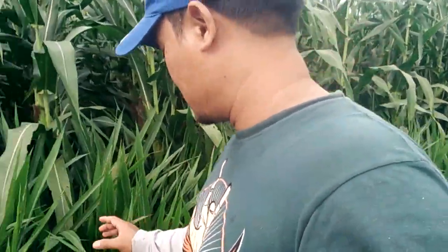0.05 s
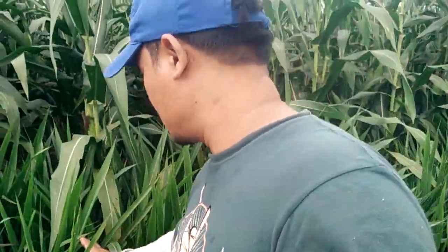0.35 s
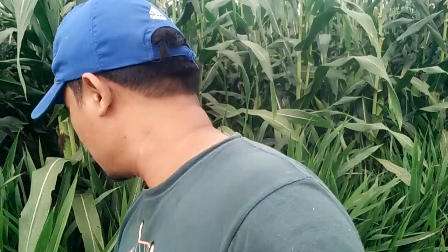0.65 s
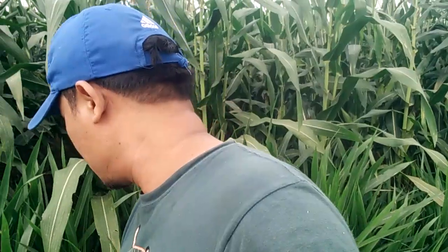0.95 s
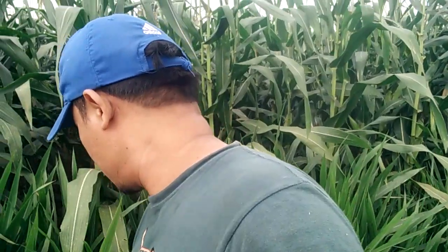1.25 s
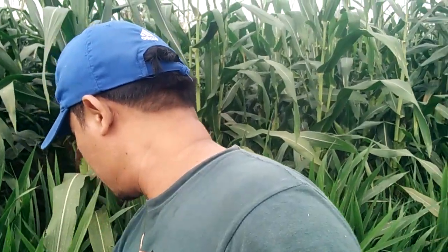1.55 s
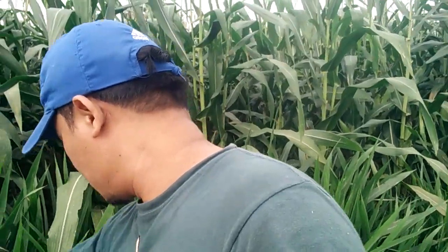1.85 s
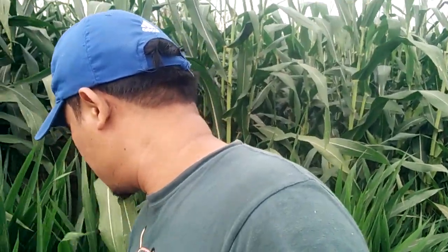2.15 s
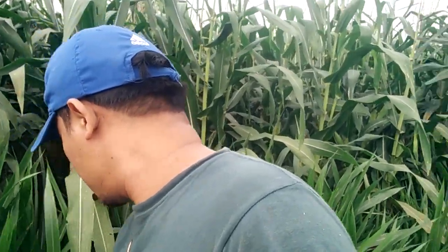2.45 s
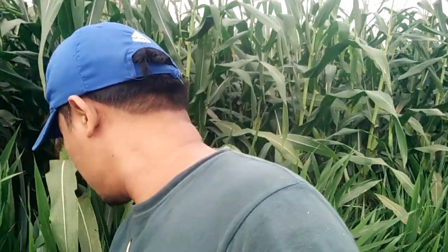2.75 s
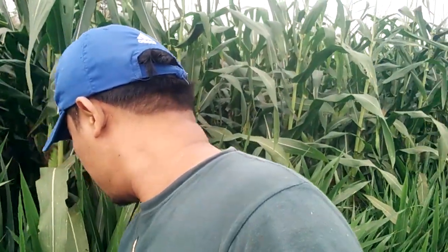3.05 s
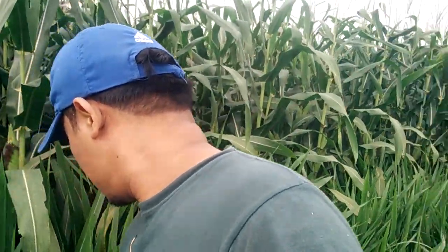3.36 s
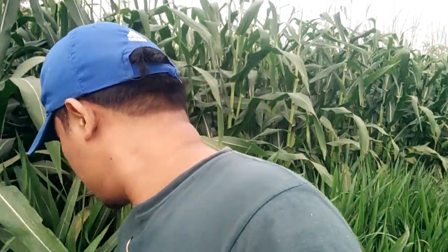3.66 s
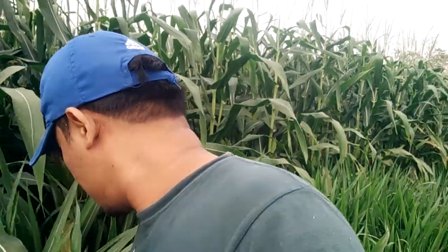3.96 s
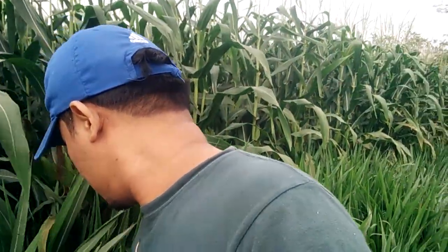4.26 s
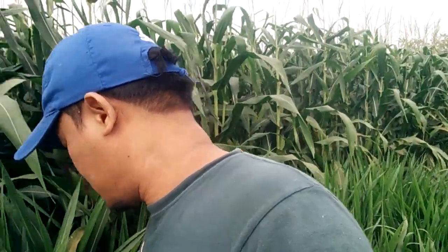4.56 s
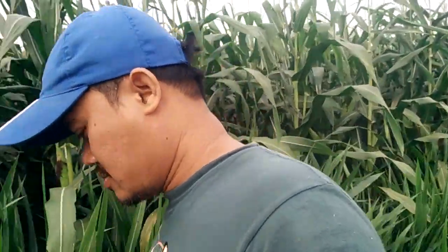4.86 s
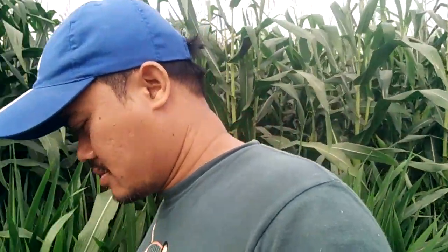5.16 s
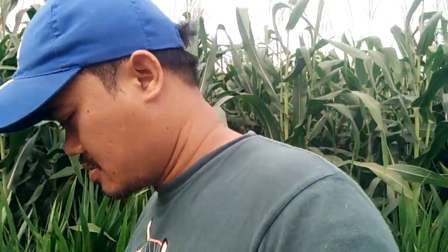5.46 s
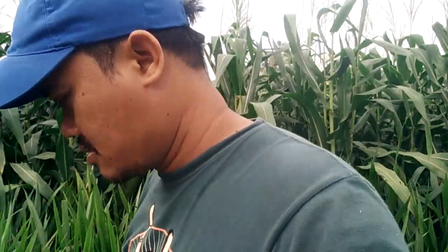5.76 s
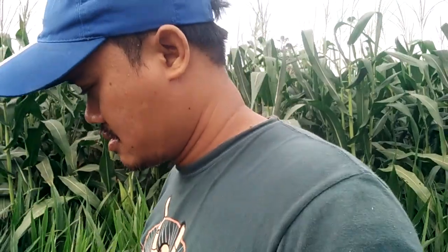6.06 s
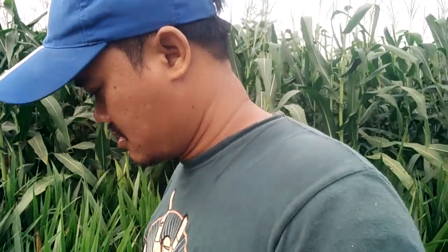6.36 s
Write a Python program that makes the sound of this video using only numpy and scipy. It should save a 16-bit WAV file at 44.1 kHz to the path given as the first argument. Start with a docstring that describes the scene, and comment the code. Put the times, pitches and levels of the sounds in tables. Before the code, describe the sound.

In a corn field, nearby leaves brush and scrape together swish after swish, bright and papery, with occasional ticks and tiny squeaks. The strongest swells fill the first four seconds or so; after a short lull comes one more, then lighter brushing. The rustle spreads around the close microphone, while a distant engine thuds evenly in the centre and high, thin insects pulse on and off behind it.

```python
"""Long corn leaves are pushed aside close by and slide over one another, swish after swish.
Stick-slip friction makes their edges hiss, their faces scrape and their bending blades sound hollow;
now and then one squeaks or snaps free. Far off, a slow single-cylinder engine, probably a field pump,
chugs as a train of exhaust pulses and knocks. Two insects pulse thinly near 7 kHz by stridulation,
over fainter chirps, a few soft low bumps and the noise of distant air."""
import sys
import numpy as np
from scipy import signal
from scipy.fft import rfft, irfft
from scipy.io import wavfile

SR = 44100
rng = np.random.default_rng(int(sys.argv[2]) if len(sys.argv) > 2 else 0)


def int16_out(signal):
    """Quantize to a 16-bit WAV file."""
    q = np.round(np.clip(np.atleast_2d(signal).T, -1, 1) * 32767)
    wavfile.write(sys.argv[1], SR, q.astype(np.int16))


N = 291501
TIME = np.arange(N) / SR

# Spectra of sliding edges, flat faces and bending blades: (frequency [Hz], level [dB])
HISS_SPECTRUM = [(2500, -57), (5000, -37), (6400, -9.5), (7400, -6.5), (8700, -1), (9700, -2),
                 (11000, -7.5), (12500, -5), (14200, -7)]
SCRAPE_SPECTRUM = [(900, -16), (2000, -15), (3000, -5), (4200, 0.5), (5500, 4.5), (7000, 0), (10000, 3.5),
                   (14000, -28)]
BEND_SPECTRUM = [(250, -40), (480, -19.5), (750, -3.5), (1000, -6), (1400, 1.5), (2050, -7.5), (2650, -3.5),
                 (3400, -9.5), (6000, -41)]
def leaves():
    """Stick-slip friction: faster sliding gives more slips, and passing contacts ring on top."""
    hiss_db, scrape_db, bend_db = swish_levels()
    slips_per_s = 7000 * from_db(.6 * (hiss_db - hiss_db.max()))
    judder = from_db(0.6 * drift(25) + 1.44 * drift(10.8))
    edges = colour(slips(slips_per_s, spread_db=2.5, blur=1.0), HISS_SPECTRUM)
    edges += from_db(-2) * contacts(7780, 10920, bandwidth_ratio=0.087, spread_db=7)
    faces = colour(slips(slips_per_s, spread_db=-0.5, blur=0.73), SCRAPE_SPECTRUM)
    faces += from_db(-4) * contacts(2666, 6900, bandwidth_ratio=0.035, spread_db=5)
    folds = colour(slips(slips_per_s / 4, spread_db=2, blur=0.84), BEND_SPECTRUM)
    folds += from_db(2) * contacts(884, 2650, bandwidth_ratio=0.11, spread_db=9)
    hiss = from_db(hiss_db + 0.5) * edges
    scrape = from_db(scrape_db - 0.5) * faces
    bend = from_db(bend_db - 3.5) * folds
    return judder * (hiss + scrape + bend)


# Leaves swept aside: (time at full speed [s], rise [s], hold [s], fall [s],
# hiss level [dB], scrape level [dB], bend level [dB])
LEAF_SWISHES = [(.01, 0.21, 0.087, 0.39, -55, -65, -71.5), (0.183, 0.043, .1, 0.5, -58.5, -73, -70),
                (0.733, 0.17, 0.044, 0.51, -41, -50.5, -63.5), (0.932, 0.22, 0.11, 0.29, -44, -51, -57.5),
                (1.481, .2, 0.0067, .39, -45, -56.5, -63.5), (2.009, 0.092, 0.18, .22, -51, -70, -88),
                (2.283, 0.33, 0.17, 0.43, -43, -53.5, -55), (2.899, 0.021, .04, 0.11, -62, -74, -80.5),
                (3.375, 0.23, 0.063, 0.45, -43.5, -54.5, -59),
                (3.831, 0.17, 0.059, 0.27, -47.5, -57.5, -61), (3.974, 0.34, .1, 0.24, -47, -53, -52),
                (4.174, 0.17, .07, 0.14, -48, -63.5, -64), (4.587, 0.025, 0.041, 0.11, -66, -82, -84),
                (4.934, 0.3, 0.11, 0.75, -53, -64, -69.5), (5.402, 0.16, 0.2, 0.35, -44.5, -58, -66),
                (5.791, 0.26, 0.26, 0.28, -64.5, -83, -79.5), (6.228, 0.14, 0.047, 0.18, -61.5, -77, -71),
                (6.515, 0.16, 0.13, .26, -58, -89, -76)]
def swish_levels():
    """Incoherent swishes add in power. Hiss follows speed; scrape and bend also follow pressure."""
    bend_lag_s = 0.011
    power = 1e-12
    for at, rise, hold, fall, hiss_db, scrape_db, bend_db in LEAF_SWISHES:
        speed_db = swell_db(at, at + hold, rise, fall)
        bending_db = swell_db(at + bend_lag_s, at + hold + bend_lag_s, rise, fall)
        pressure_db = -22 * ((TIME - at - hold / 2) / (rise + hold + fall)) ** 2  # greatest mid-swish
        levels = [hiss_db + speed_db,
                  scrape_db + 0.86 * speed_db + pressure_db,
                  bend_db + 0.87 * bending_db + pressure_db]
        power = power + from_db(np.maximum(levels, -130)) ** 2
    return 10 * np.log10(power)


def slips(per_s, spread_db, blur):
    """Shot noise: random clicks of uneven size over the Gaussian blur of countless smaller ones."""
    sizes = from_db(spread_db * np.minimum(rng.exponential(1, (2, N)), 4))
    signs = rng.choice([-1, 1], (2, N))
    slipping = rng.random((2, N)) < per_s / SR
    return unit_rms(sizes * signs * slipping) + blur * rng.standard_normal((2, N))


def contacts(low_hz, high_hz, bandwidth_ratio, spread_db):
    """Forced resonance: each passing contact sets part of a blade ringing for a moment."""
    out = 0
    for hz in np.geomspace(low_hz, high_hz, 9):
        mode = resonate(rng.standard_normal((2, N)), hz, bandwidth_ratio * hz)
        out += mode * from_db(spread_db * np.minimum(drift(30), 2))
    return unit_rms(out)


# Leaves snapping free: (time [s], level [dB], decay time [s], frequency [Hz])
LEAF_SNAPS = [(0.604, -37, 0.0064, 9000), (0.661, -29.5, 0.0099, 8600), (0.714, -28, 0.027, 8800),
              (0.932, -30.5, .006, 3160), (1.1216, -30, 0.003, 9000), (1.13, -40, 0.0048, 10300),
              (1.215, -25, 0.0014, 9100), (1.3025, -31.5, 0.0025, 12500), (1.860, -47.5, 0.0082, 7800),
              (2.444, -34, .004, 9000), (2.900, -46, 0.008, 8900), (3.257, -36, 0.0044, 8200),
              (3.362, -42, 0.007, 9150), (4.125, -33, 0.025, 9100), (4.195, -35, .01, 9100),
              (4.582, -50, 0.0033, 7250), (4.792, -49, .0064, 2000), (5.002, -45.5, .008, 2100),
              (5.272, -32.5, 0.0018, 8200), (5.293, -41, .002, 8600), (6.051, -44, 0.0032, 12900),
              (6.067, -36.5, 0.0074, 9060), (6.229, -45, 0.0051, 1810)]
def snaps():
    """Transient excitation: a leaf lets go with a crack that drives a damped resonance of its edge."""
    out = np.zeros((2, N))
    age = TIME[:SR // 20]
    for at, db, decay, hz in LEAF_SNAPS:
        force = from_db(db) * (np.exp(-age / decay) + 0.28 * np.exp(-age / 0.018))
        attack = 1 - np.exp(-age / (0.36 * decay))
        crack = force * attack * rng.choice([-1, 1], (2, len(age)))
        edge = resonate(resonate(crack, hz, 0.35 * hz), hz, 0.35 * hz)
        start = int(at * SR)
        out[:, start:start + len(age)] += from_db(3.5) * edge + 0.073 * crack
    return out * [[1], [from_db(-15)]]  # a weak side signal keeps snaps near the centre


# Left-right coherence of the leaves: (frequency [Hz], correlation [ratio])
LEAF_COHERENCE = [(4000, 1), (5000, .92), (6000, .82), (7000, .53), (9000, .44), (10500, .37), (14000, .5)]
def widen(pair):
    """Partial coherence: mid and side sum to channels alike in the bass, partly apart in the treble."""
    coherence = np.clip(per_bin(LEAF_COHERENCE), 0, 1)
    mid, side = pair
    side = irfft(rfft(side) * np.sqrt((1 - coherence) / (1 + coherence)), N)
    return np.array([mid + side, mid - side])


# Squeaking blades: (time [s], frequency [Hz], level [dB], width [s])
LEAF_SQUEAKS = [(.99, 820, -54.5, 0.005), (2.601, 2560, -54, 0.018), (3.799, 1400, -56.5, 0.011),
                (3.968, 1370, -58, 0.0038), (4.146, 1100, -53, 0.0048), (4.196, 1400, -53, 0.0091),
                (4.201, 3270, -55, 0.0074), (4.227, 1270, -50, 0.002), (4.263, 1010, -56, 0.0022),
                (5.944, 2030, -67, 0.023)]
def squeaks():
    """Friction oscillation: a blade that sticks and slips almost periodically gives a brief tone."""
    return sum(rough_tone(*squeak) for squeak in LEAF_SQUEAKS)


# Progress of the crank: (time [s], firing count [cycles])
CRANK_CYCLES = [(-.114, -2), (.0911, 0), (.499, 4), (1.113, 10), (1.8324, 17), (2.3428, 22), (3.1575, 30),
                (4.0771, 39), (4.7936, 46), (5.513, 53), (6.5409, 63), (6.746, 65)]
# Repeating round of five uneven thumps: (level [dB])
THUMP_ROUND = [-52, -54.5, -51.5, -54.5, -53]
# Near misfires, each weakening the closest thump: (time [s])
WEAK_FIRINGS = [.91, 2.55, 3.46, 4.08, 5.1]
# Transmission over the field: (time [s], thump gain [dB], ringing level [dB], clatter level [dB])
FIELD_TRANSMISSION = [(.1, -1.5, -56.5, -67), (1.0, 0.5, -56, -59.5), (1.4, -1, -67, -67.5),
                      (2.1, 3.5, -60.5, -70), (3.1, 2, -62.5, -68.5), (3.45, -1, -59, -68.5),
                      (4.3, 2, -64.5, -76.5), (4.7, -7, -66.5, -74.5), (5.05, 2.5, -63, -63.5),
                      (5.5, -2, -61.5, -64.5), (5.95, 1.5, -71, -67.5), (6.3, 2, -59, -61.5)]
def engine():
    """A quasi-periodic pulse train: each firing gives an exhaust thump and mechanical clatter."""
    times, cycles = np.transpose(CRANK_CYCLES)
    numbers = np.arange(cycles[0] + 1, cycles[-1]).astype(int)
    firings = np.interp(numbers, cycles, times)
    carry_db, rings_db, clatters_db = in_time(FIELD_TRANSMISSION, firings)
    weak = np.isin(numbers, np.round(np.interp(WEAK_FIRINGS, times, cycles)))
    thumps_db = np.take(THUMP_ROUND, numbers, mode="wrap") + carry_db - 6.5 * weak
    thumps_db += 0.47 * rng.standard_normal(len(firings))
    return exhaust(firings, thumps_db, rings_db) + clatter(firings, clatters_db)


# Rumble in the field and modes of the pipe: (delay [s], frequency [Hz], level [dB], width [s])
FIELD_RUMBLE = [(0.0428, 56.8, -11.5, 0.031), (0.0159, 141.4, -12, 0.017), (0.02555, 182.7, -12.5, 0.011),
                (0.01183, 242.5, -10.5, 0.0073), (.017, 297.3, -15, 0.011)]
PIPE_MODES = [(.021, 454, -1.5, 0.0084), (.0225, 591, -3, 0.019), (.0255, 650, 3, 0.0027)]
def exhaust(firings, thumps_db, rings_db):
    """Resonance and reverberation: each pressure pulse rings the pipe and rumbles on in the field."""
    thump_hz = 98
    out = np.zeros(N)
    for at, thump_db, ring_db in zip(firings, thumps_db, rings_db):
        near, age = around(at)
        thump = -np.cos(2 * np.pi * thump_hz * age + 0.27) * bell(age + 0.00039, width=0.0045)
        # the rumble blends many paths, so it varies less than the direct thump
        rumble = from_db(0.52 * thump_db - 26) * mode_bursts(age, FIELD_RUMBLE, spread_db=2.5)
        ringing = from_db(ring_db - 6.5) * mode_bursts(age, PIPE_MODES, spread_db=4)
        out[near] += from_db(thump_db + 5) * thump + rumble + ringing
    return out


def mode_bursts(age, modes, spread_db):
    """Modal superposition: delayed bursts of a few resonances, varying from firing to firing."""
    out = 0
    for delay, hz, db, width in modes:
        phase, strength, detune = rng.standard_normal(3)
        wave = np.cos(2 * np.pi * hz * (1 + 0.031 * detune) * (age - delay) + 0.73 * phase)
        out += from_db(db + spread_db * strength) * bell(age - delay, width) * wave
    return out


# Knocks within a cycle: (delay after the thump [s], level [dB], width [s])
CYCLE_KNOCKS = [(-.019, 0, 0.0051), (.002, 3, 0.0082), (0.035, -3, 0.0091)]
# Spectrum of the knocks: (frequency [Hz], level [dB])
CLATTER_SPECTRUM = [(400, -36), (700, -5.5), (920, 7), (1150, -6.5), (1600, -1.5), (2200, -8.5),
                    (2700, -17), (4000, -17.5)]
def clatter(firings, clatters_db):
    """Impact noise: piston and valves knock in each cycle and excite the block's main resonance."""
    knocking = np.zeros(N)
    for at, clatter_db in zip(firings, clatters_db):
        near, age = around(at)
        for delay, db, width in CYCLE_KNOCKS:
            scatter_db = 2.3 * rng.uniform(-1.1, 1)
            knocking[near] += from_db(clatter_db + db + scatter_db) * bell(age - delay, width)
    block = unit_rms(resonate(rng.standard_normal(N), hz=894, width_hz=390))
    rattle = colour(rng.standard_normal(N), CLATTER_SPECTRUM)
    return from_db(-76.5) * block + knocking * (from_db(-1) * rattle + from_db(-18.5) * block)


# Phrases sung by both insects: (start [s], end [s], level [dB])
SONG_PHRASES = [(0, 0.466, -53.5), (0.595, 1.557, -57.5), (1.838, 2.6, -66), (3.09, 4.285, -61),
                (4.65, 5.103, -59.5), (5.2, 6.18, -58), (6.482, 6.61, -61)]
# Wing motion of the nearer insect: (time [s], stroke count [cycles])
WING_STROKES = [(-.025, -1), (.036, 0), (.578, 9), (1.318, 21), (1.802, 29), (3.058, 50), (4.255, 70),
                (4.677, 77), (5.216, 86), (5.76, 95), (6.183, 102), (6.665, 110)]
def insects():
    """Phase drift: two singers of slightly different pace slide in and out of step."""
    song = sum(from_db(db + swell_db(start, end, rise=0.091, fall=0.19))
               for start, end, db in SONG_PHRASES)
    strokes, = in_time(WING_STROKES, TIME)
    farther_period_s = .06233
    nearer = stridulation(strokes, hz=7434, sag_hz=191, width=0.18, rough_hz=50.6)
    farther = stridulation(TIME / farther_period_s, hz=7260, sag_hz=222.5, width=0.22, rough_hz=82.2)
    return song * (nearer + from_db(-7) * farther)


def stridulation(strokes, hz, sag_hz, width, rough_hz):
    """Stridulation: each stroke swells and fades, its pitch arching with the speed of the wing."""
    within = (strokes + .5) % 1 - .5
    pitch = hz - sag_hz * (1 - np.cos(2 * np.pi * within)) / 2 + rough_hz * drift(293)
    return oscillator(pitch) * bell(within, width) * from_db(2.47 * drift(80))


# Other insects farther off: (time [s], frequency [Hz], level [dB], width [s])
FAR_CHIRPS = [(.165, 6900, -73, 0.016), (2.815, 7250, -63, 0.011), (2.84, 6480, -69.5, 0.019),
              (2.975, 6340, -73, 0.03), (4.32, 6980, -64.5, 0.012), (4.41, 6700, -71.5, 0.014),
              (4.54, 6700, -79, 0.0067), (4.72, 6300, -71.5, 0.054), (6.15, 6270, -76, 0.033),
              (6.25, 6950, -73, .012), (6.33, 6700, -74, 0.04), (6.43, 7190, -62, 0.01)]
def chirps():
    """Narrow-band pulses: distant insects are heard as faint, brief tones."""
    return sum(rough_tone(*chirp) for chirp in FAR_CHIRPS)


# Soft low bumps: (time [s], level [dB])
LOW_BUMPS = [(3.006, -49), (6.087, -52), (6.172, -48)]
def bumps(hz=83, width=0.0087):
    """Tone bursts: a cycle or two of a low tone is heard as a bump."""
    return sum(from_db(db) * np.sin(2 * np.pi * hz * (TIME - at)) * bell(TIME - at, width)
               for at, db in LOW_BUMPS)


# Spectrum of the distant air: (frequency [Hz], level [dB])
AIR_SPECTRUM = [(22, -24), (40, -12), (60, 3.5), (110, 4.5), (190, -7.5), (290, -5), (380, -15),
                (650, -12.5), (950, -11.5), (2000, -20.5), (3300, -26.5), (14000, -31.5)]
def air():
    """Ambient noise: a broad spectrum, strongest in the bass, whose level wavers."""
    return from_db(-66.5) * colour(rng.standard_normal(N), AIR_SPECTRUM) * from_db(2.7 * drift(8.7))


def rough_tone(at, hz, db, width):
    """Random frequency modulation roughens a tone that swells and fades."""
    return from_db(db) * bell(TIME - at, width) * oscillator(hz + 110 * drift(201))


def oscillator(hz):
    """Phase is the integral of frequency; the sine has unit rms."""
    return np.sqrt(2) * np.sin(2 * np.pi * np.cumsum(hz) / SR)


def resonate(x, hz, width_hz):
    """A damped two-pole resonator passes a band around its natural frequency."""
    r = np.exp(-np.pi * width_hz / SR)
    feedback = [1, -2 * r * np.cos(2 * np.pi * hz / SR), r * r]
    return signal.lfilter(np.array([1, 0, -1]) * (1 - r * r) / 2, feedback, x + 1e-18)


def colour(x, spectrum):
    """Source and filter: a spectrum shapes the excitation, returned at unit rms."""
    return unit_rms(irfft(rfft(x) * from_db(per_bin(spectrum)), N))


def drift(hz):
    """Low-pass noise gives a random fluctuation of unit rms."""
    hop, settle = 40, 2000
    r = np.exp(-2 * np.pi * hz * hop / SR)
    noise = rng.standard_normal(N // hop + settle + 2)
    slow = signal.lfilter([1], [1, -2 * r, r * r], noise)[settle:]
    return np.interp(np.arange(N) / hop, np.arange(len(slow)), unit_rms(slow))


def swell_db(start, end, rise, fall):
    """Envelope: 0 dB from start to end, 20 dB down one rise before and one fall after."""
    before = np.maximum(start - TIME, 0) / rise
    after = np.maximum(TIME - end, 0) / fall
    return -20 * (before ** 1.03 + after ** 1.2)


def bell(t, width):
    """Gaussian window; width is its standard deviation."""
    return np.exp(-.5 * np.minimum((t / width) ** 2, 100))


def around(at):
    """The samples around an event, and their times relative to it."""
    near = slice(max(int(at * SR) - SR // 20, 0), int(at * SR) + SR // 6)
    return near, TIME[near] - at


def in_time(rows, at):
    """Linear interpolation of each column at the given times."""
    times, *columns = np.transpose(rows)
    return [np.interp(at, times, column) for column in columns]


def per_bin(points):
    """Interpolation over log frequency at every Fourier bin."""
    hz, value = np.transpose(points)
    return np.interp(np.log(np.arange(N // 2 + 1) * SR / N + 1), np.log(hz), value)


def from_db(db):
    return 10 ** (np.asarray(db) / 20)


def unit_rms(x):
    return x / np.sqrt(np.mean(x ** 2) + 1e-20)


def scene():
    """Superposition: the near rustle spreads in stereo, while the far sources lie in the centre."""
    lull_db = -12 * bell(TIME - 4.51, width=0.044)  # the rustle and the air dip briefly
    background = from_db(0.7 * lull_db) * air()
    foliage = widen(from_db(lull_db) * leaves() + snaps()) + squeaks()
    return foliage + engine() + insects() + chirps() + bumps() + background


def record(dry):
    """An elliptic low-pass filter cuts the top of the treble steeply."""
    cutoff_hz = 14220
    return signal.sosfilt(signal.ellip(12, .2, 70, cutoff_hz, fs=SR, output="sos"), dry)


dry = scene()
out = record(dry)
int16_out(out)
```